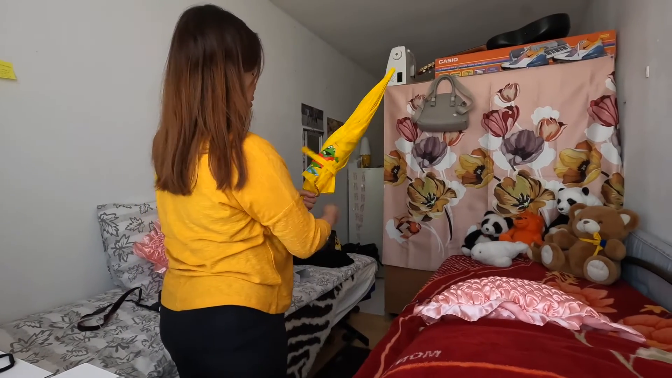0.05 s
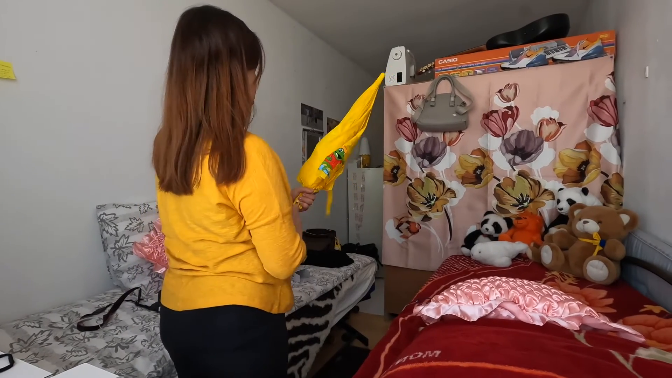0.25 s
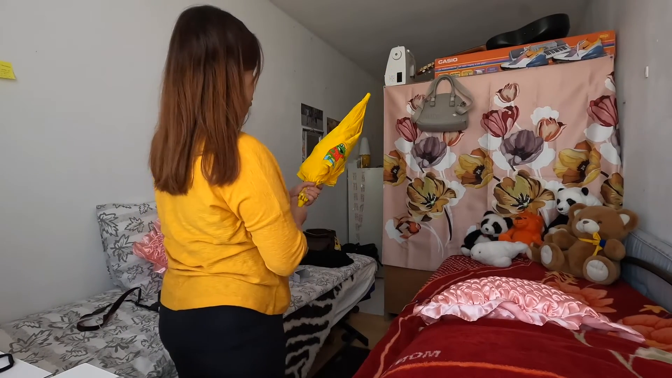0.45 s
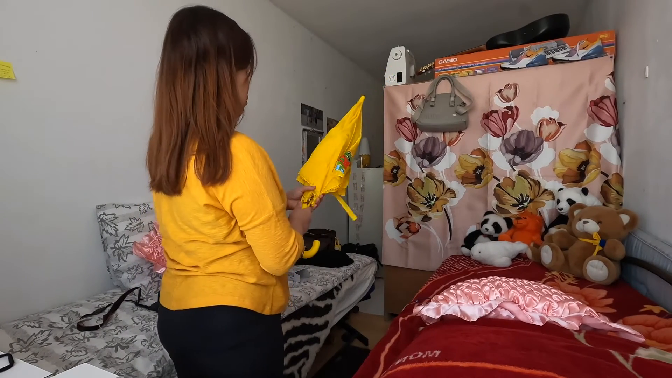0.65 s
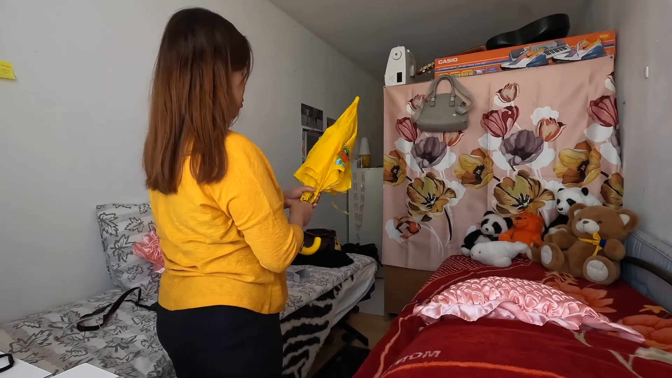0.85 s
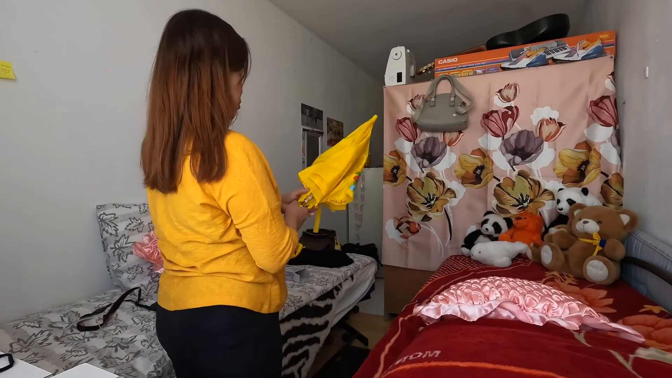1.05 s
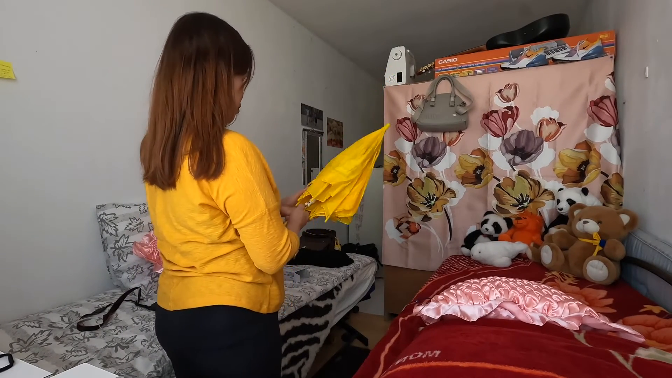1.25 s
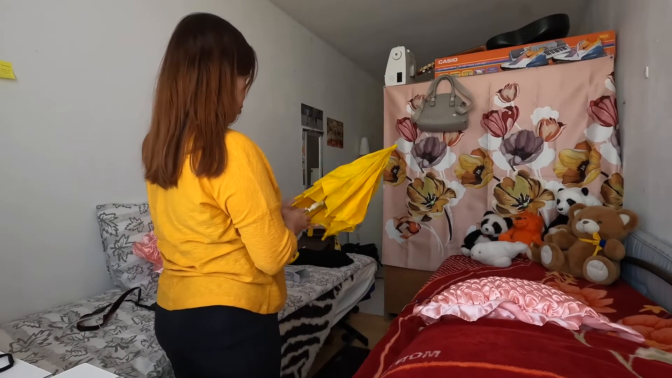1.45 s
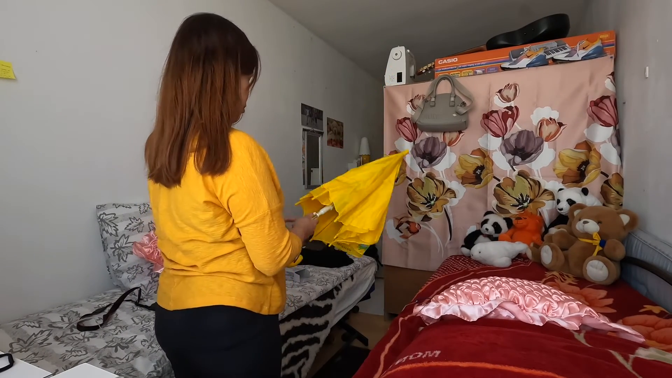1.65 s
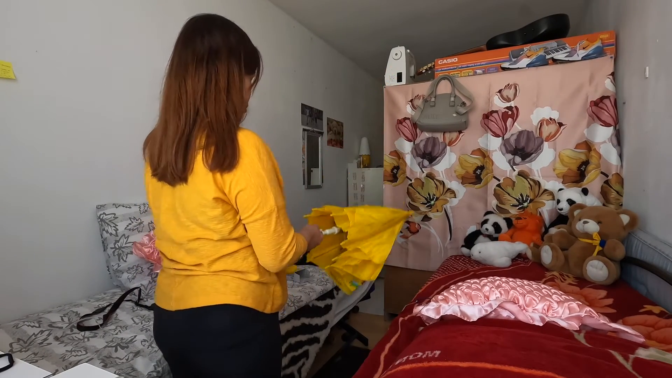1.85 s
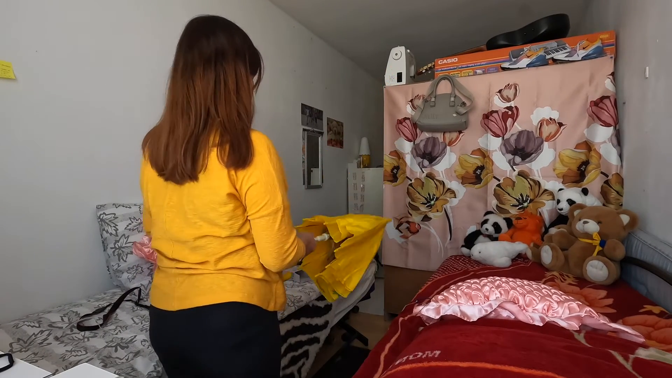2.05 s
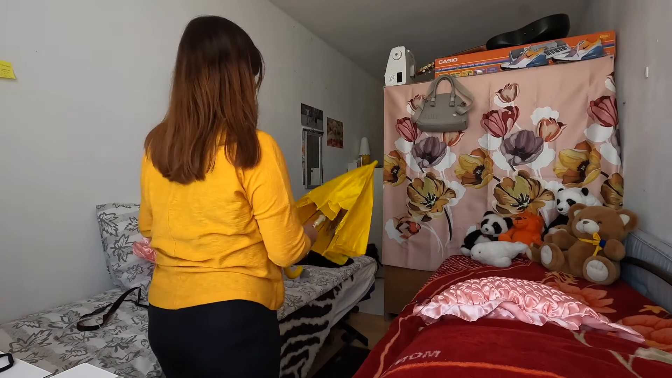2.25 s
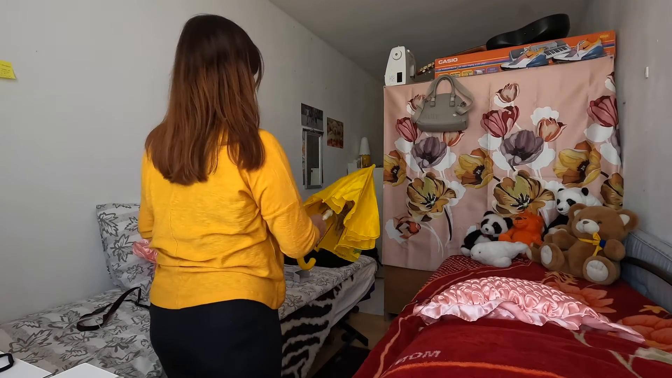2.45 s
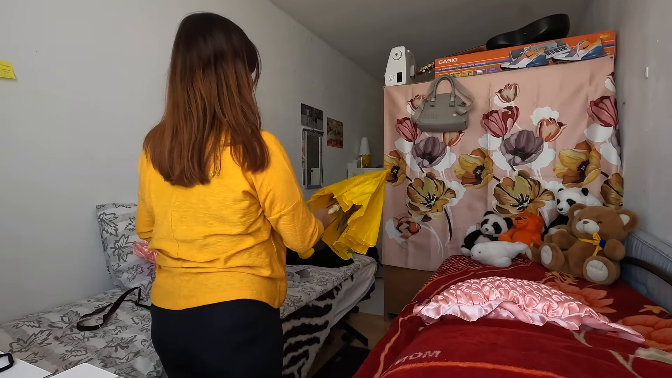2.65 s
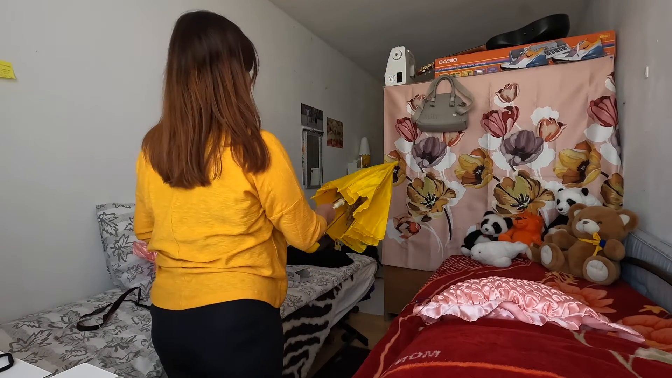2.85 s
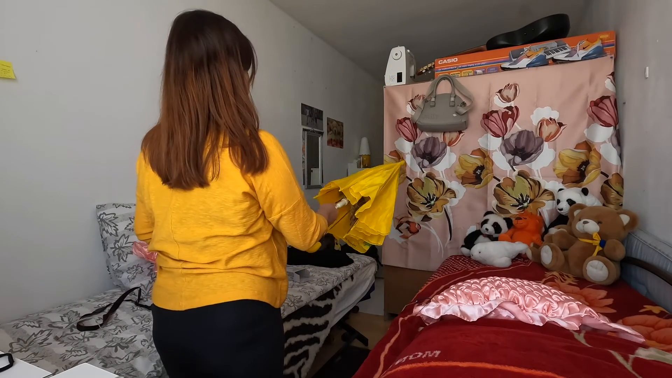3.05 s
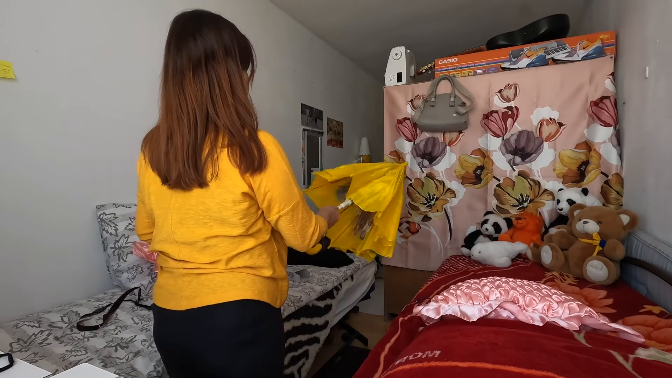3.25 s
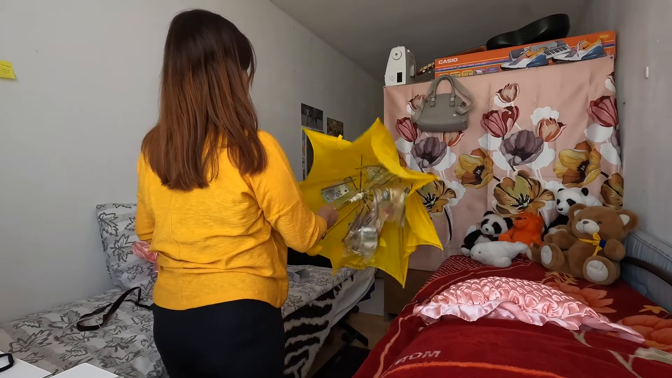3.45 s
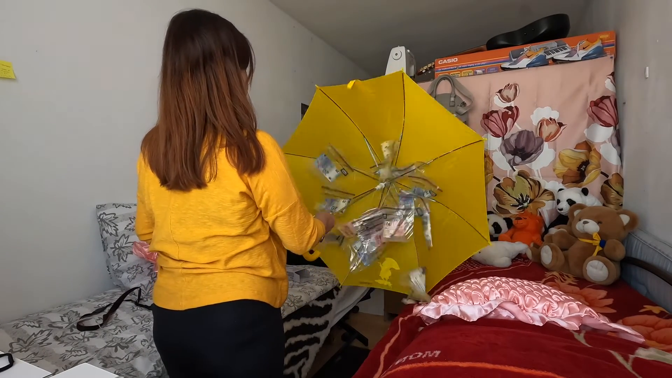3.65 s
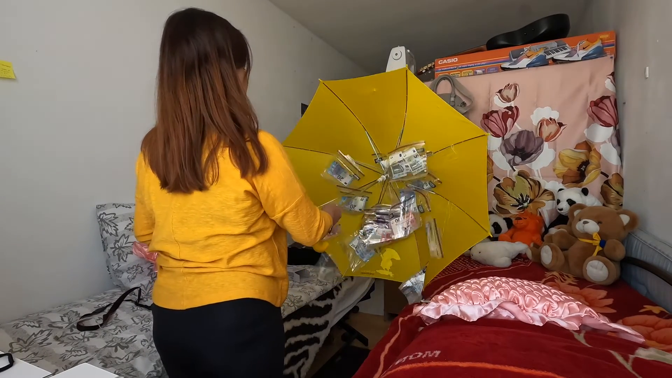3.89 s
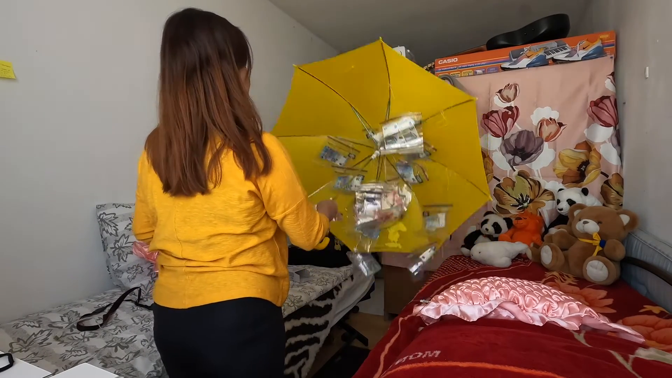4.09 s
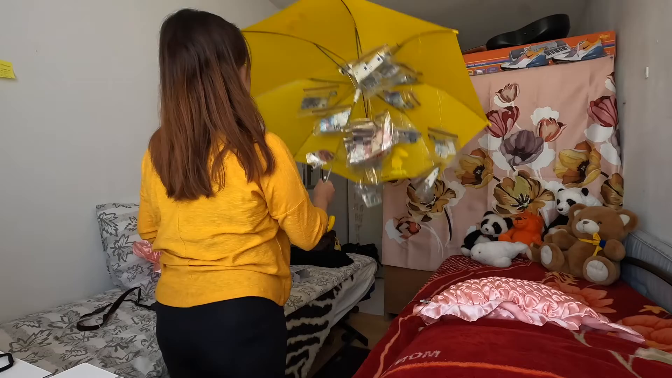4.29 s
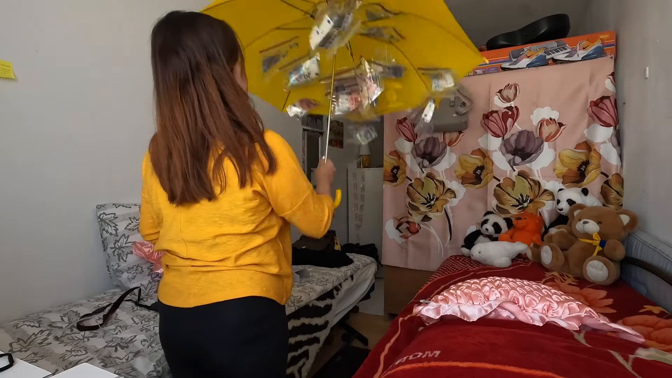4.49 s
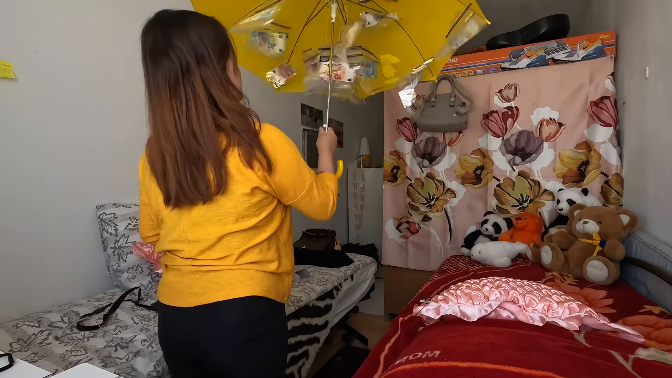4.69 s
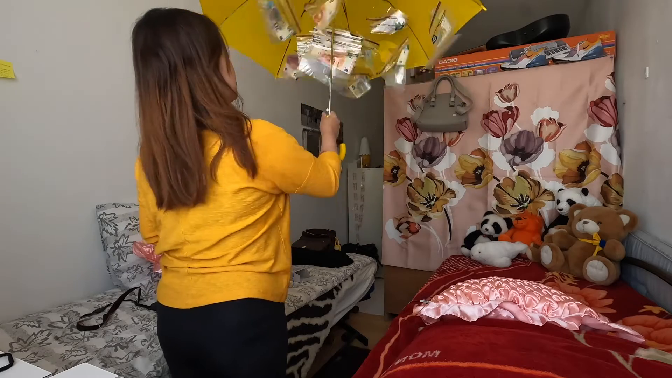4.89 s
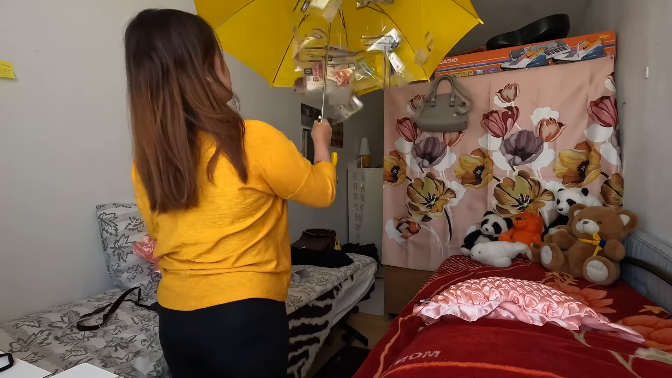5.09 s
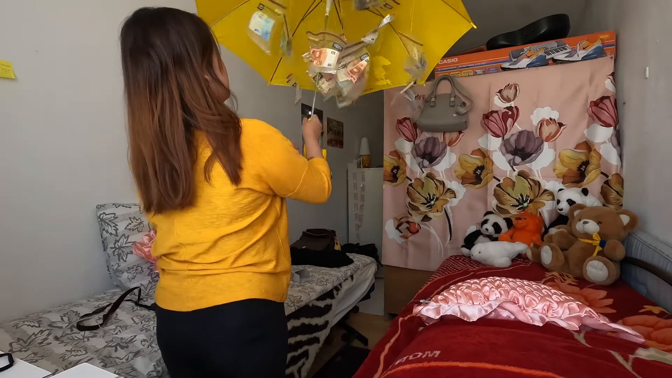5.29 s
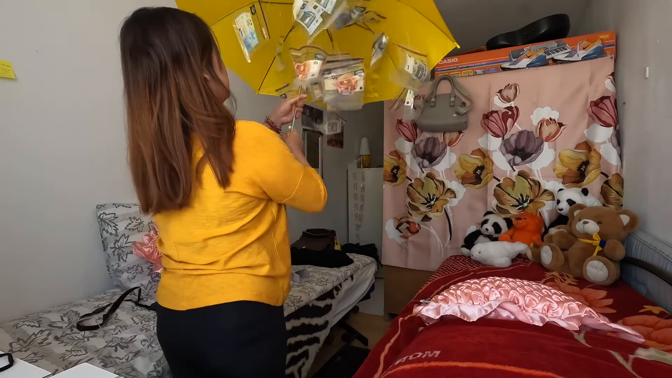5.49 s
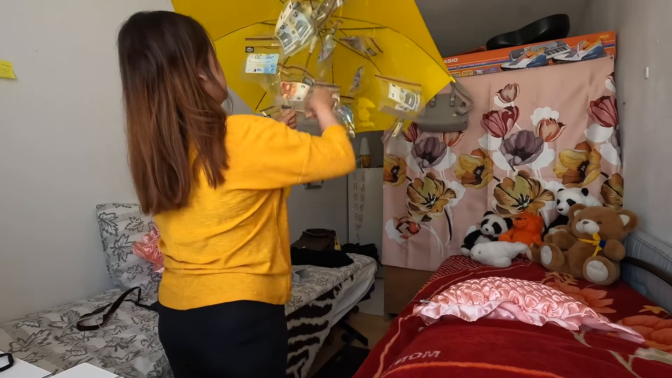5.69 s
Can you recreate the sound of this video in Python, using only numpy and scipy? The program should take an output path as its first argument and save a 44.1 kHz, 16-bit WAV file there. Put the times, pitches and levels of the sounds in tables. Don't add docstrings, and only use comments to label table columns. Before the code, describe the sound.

An umbrella hung with plastic pouches is rustled, pushed open with a booming, overloaded snap, then raised as the pouches crinkle and swing.

```python
import sys
import numpy as np
from scipy import signal
from scipy.fft import rfft, irfft, next_fast_len
from scipy.io import wavfile
from scipy.ndimage import uniform_filter1d, map_coordinates

SR = 44100
rng = np.random.default_rng(int(sys.argv[2]) if len(sys.argv) > 2 else 0)


def to_wav(sig):
    pcm = np.clip(np.atleast_2d(sig), -1, 1) * 32767
    pcm = np.round(pcm).astype(np.int16)
    wavfile.write(sys.argv[1], SR, pcm.T)


def boost(x):
    u = np.asarray(x, float) / 20
    return 10 ** u


N = 252604


def unit(x):
    return x / np.sqrt(np.mean(x ** 2) + 1e-20)


def along(points, hz):
    point_hz, value = np.transpose(points)
    return np.interp(np.log(hz + 1), np.log(point_hz + 1), value)


def curves(rows):
    s, *columns = np.transpose(rows)
    return [np.interp(np.arange(N) / SR, s, column) for column in columns]


def wobble(rate_hz):
    knots = rng.standard_normal(int(N * rate_hz / SR) + 4)
    return map_coordinates(knots, [np.arange(N) * rate_hz / SR])


def filtered(x, response):
    size = next_fast_len(N + SR // 2)
    return irfft(rfft(x, size) * response(np.fft.rfftfreq(size, 1 / SR)), size)[..., :N]


def coloured(x, spectrum):
    return unit(filtered(x, lambda hz: boost(along(spectrum, hz))))


def band_noise(low_hz, high_hz, order, count):
    sos = signal.butter(order, [low_hz, high_hz], "band", fs=SR, output="sos")
    return unit(signal.sosfilt(sos, rng.standard_normal(count)))


def ring(modes, attack_s, scatter_db, rough=0):
    t = np.arange(SR) / SR
    tones = np.zeros(SR)
    for hz, db, t60_s in modes:
        drift = rough * np.cumsum(rng.standard_normal(SR)) / np.sqrt(SR)
        level_db = db + scatter_db * rng.standard_normal() - 60 * t / t60_s
        tones += boost(level_db) * np.sin(2 * np.pi * hz * t + drift)
    return tones * (1 - np.exp(-t / attack_s))


def add(track, start_s, sound):
    part = track[round(start_s * SR):][:len(sound)]
    part += sound[:len(part)]


# hz, db_per_hz
PLASTIC = [(710, -24.5), (1200, -2), (1280, -7), (1350, -2), (3240, -5.5), (3600, -14), (4680, -39.5),
           (7920, -120)]
CRISP = [(2120, -31), (3600, -2.5), (4510, 0), (7800, -9), (10100, -35), (17200, -120)]
SHEEN = [(6000, -13), (7900, -10), (8960, -9), (9740, -5), (11300, -10), (12100, -7.5), (12900, -12),
         (13900, -12.5), (15000, -16), (15400, -26), (15600, -85)]
CLOTH = [(150, -31), (260, -6.5), (295, -1), (426, 1), (494, -8), (549, 0.5), (1400, -3.5), (1820, -60),
         (3080, -120)]


def rustle():
    crinkle_db, stiff_db = handling()
    crisp_db = -5 + 0.86 * stiff_db
    sheen_db = -15 + 1.36 * stiff_db
    flap_db = -3 - 0.1 * stiff_db + 0.11 * (crinkle_db + 45)
    buckling = patchy(crackle(14000, spread_db=1.0, clump_db=0.74), patchy_db=1.18)
    crinkle = coloured(buckling, PLASTIC)
    crinkle += boost(crisp_db) * coloured(buckling, CRISP)
    crinkle += boost(sheen_db) * coloured(buckling, SHEEN)
    flap = boost(flap_db) * coloured(crackle(7000, spread_db=1.5, clump_db=1.6), CLOTH)
    return boost(crinkle_db - 6.0) * (crinkle + flap)


def crackle(per_second, spread_db, clump_db):
    fires = rng.random(N) < per_second / SR
    bounded = np.minimum(rng.exponential(size=N), 3.5)
    size = boost(spread_db * bounded + clump_db * wobble(28))
    return fires * size * rng.standard_normal(N)


def patchy(x, patchy_db):
    z = signal.stft(x, nperseg=512)[2]
    field = uniform_filter1d(rng.standard_normal(z.shape), size=5, axis=0)
    field = uniform_filter1d(field, size=4, axis=1)
    return signal.istft(z * boost(patchy_db * unit(field)), nperseg=512)[1][:N]


# start_s, level_db, swell_s, fade_s,
# stiffness_db
MOVES = [(0.013, -21, 0.65, 0.063, 3.5), (0.16, -40, 0.16, 0.28, 2.5), (0.624, -53.5, 0.18, 0.73, 1.5),
         (0.736, -46, 0.13, 0.21, -2), (0.823, -43, 0.17, 0.28, 4), (0.918, -49.5, 0.03, 0.4, -1.5),
         (1.07, -49.5, 0.44, 0.075, 0.5), (1.198, -45, 0.091, 0.4, 4.5),
         (1.279, -45.5, 0.12, 0.32, 0.5), (1.37, -41.5, 0.14, 0.089, 6),
         (1.607, -39.5, 0.11, 0.29, 3.7), (1.822, -48.5, 0.11, 0.26, -1),
         (2.006, -43.5, 0.079, 0.23, -0.5), (2.211, -46, 0.13, 0.084, 1), (2.416, -53.5, 0.08, 0.53, 1),
         (2.65, -55.5, 0.047, 0.14, -1.5), (2.744, -57, 0.03, 0.11, 5.5),
         (4.095, -41, 0.53, 0.099, -4.2), (4.164, -45.5, 0.073, 0.11, 2),
           (4.269, -44.1, 0.36, 0.27, -1.5), (4.381, -48.5, 0.037, 0.088, 5.5),
           (4.5, -52.5, 0.29, 0.8, 3.5), (4.706, -38.5, 0.072, 0.15, 0.3), (4.82, -37, 0.062, 0.15, -4),
           (4.907, -32.5, 0.025, 0.32, -3.2), (5.14, -35.5, 0.057, 0.12, -0.7),
           (5.226, -38, 0.086, 0.52, -3.2), (5.305, -37, 0.044, 0.077, 0), (5.429, -34.0, 0.02, 0.16, -2.5),
           (5.562, -37, 0.12, 0.1, -1), (5.645, -45.5, 0.076, 0.75, -1.2),
         (.118, -48, .02, .1, -2),
    (1.5, -56, .2, .2, 10),
    (4.675, -49, 0.066, .06, 16),
]


def handling():
    s, db, swell_s, fade_s, stiff_db = np.transpose(MOVES)[..., None]
    late_s = np.arange(N) / SR - s
    power = boost(2 * (db - 20 * np.maximum(-late_s / swell_s, late_s / fade_s)))
    effort, push_stiff_db = push()
    total = power.sum(0) + effort ** 2 + 1e-12
    stiffness_db = ((power * stiff_db).sum(0) + effort ** 2 * push_stiff_db) / total
    return 10 * np.log10(total), stiffness_db


# time_s, effort_db, stiffness_db
PUSH = [
    (3.278, -69, 3),
    (3.296, -43, 2),
    (3.345, -37.5, 2),
    (3.62, -30, 0.5),
    (3.742, -26, -3),
    (3.756, -24, -2),
    (3.826, -17.5, -2),
    (3.948, -38.5, -3.5),
    (4.008, -57, 0),
]


def push():
    t = np.arange(N) / SR
    effort_db, stiff_db = curves(PUSH)
    return boost(effort_db) * (t > PUSH[0][0]) * (t < PUSH[-1][0]), stiff_db


# start_s, pump_db, drum_db
BLOWS = [
    (3.783, -5, -31),
    (3.823, 2.5, 0),
    (3.845, -18, -15),
    (3.865, -21, -14),
]
# hz, level_db, t60_s
PUMP = [(25.87, -5, 0.81), (13.32, -12.5, 2.3), (33, -13.5, 0.88), (59.5, -4, 0.6), (79.6, -10.5, 0.15)]
# hz, level_db, t60_s
DRUM = [(125.2, -1, 0.28), (139.9, 1, 0.29), (165.1, -4.5, 0.223), (232.6, -1.5, 0.14), (264.6, -2, 0.1),
        (335, -7.5, 0.135), (388, 0, 0.073), (607, -2, 0.072), (740, -6.5, 0.079), (1070, -11, 0.11),
        (1240, -11, 0.088)]


def snap():
    heave, boom, t = np.zeros(N), np.zeros(N), np.arange(SR) / SR
    for s, pump_db, drum_db in BLOWS:
        add(heave, s, boost(pump_db) * ring(PUMP, 0.0051, scatter_db=2.5))
        crack = 0.099 * boost(-60 * t / 0.014) * rng.standard_normal(SR)
        panels = ring(DRUM, 0.0026, scatter_db=0, rough=7.8)
        add(boom, s, boost(drum_db - 5.0) * (panels + crack))
    return heave, boom


# start_s, peak_db, pitch_hz, spit_db (relative)
CRINKLES = [(0.1538, -25, 3280, -2), (0.725, -31, 2150, -20), (1.1628, -45, 1450, -13),
            (1.574, -30.5, 3780, -2), (1.9794, -34, 1340, -20), (2.7384, -50, 1170, -7),
            (3.293, -27.5, 1050, -16.5), (3.6917, -17, 1000, -17), (3.7574, -5.5, 2570, -25.5),
            (3.8226, -2, 1185, -11), (3.826, -5.5, 2900, -4.5), (3.838, -9.5, 1900, -8),
            (4.051, -28, 3500, -15), (4.0882, -28.5, 3300, -20), (4.158, -33, 1240, -13),
            (4.225, -34, 1000, -23), (4.2955, -28.5, 1710, -23), (4.376, -37, 1420, -8),
            (4.497, -42, 1800, -18), (4.809, -35, 2490, -19), (4.8913, -29, 1870, -34),
            (5.118, -26, 1340, -14), (5.2999, -32, 3270, -26), (5.428, -21, 1050, -19),
            (5.5453, -23, 2960, -18), (5.6476, -26.5, 1240, -10)]


def folds():
    out, t = np.zeros(N), np.arange(SR // 5) / SR
    for s, db, hz, spit_db in CRINKLES:
        t60_s = 0.1 * (1000 / hz) ** 0.2
        body = band_noise(hz * 0.91, hz * 1.07, 1, len(t))
        spit = band_noise(3500, 8500, 2, len(t))
        envelope = boost(db - 12.5 - 60 * t / t60_s) * (1 - np.exp(-t / 0.0042))
        add(out, s, envelope * (body + boost(spit_db) * spit))
    return out


# start_s, peak_db, pitch_hz
PATS = [(0.914, -35.5, 950), (1.069, -34.5, 610), (1.199, -38, 626), (1.259, -40, 695), (1.358, -37, 780),
        (1.409, -39.5, 1100), (1.611, -48, 1300), (3.446, -25.5, 440), (3.547, -21.5, 1140),
        (3.658, -17.5, 615), (3.7075, -12, 1050), (4.094, -37, 541), (4.939, -25.5, 1190),
        (5.122, -27, 1280), (5.135, -28, 420), (5.264, -30, 1350), (5.43, -23, 1100)]


def pats():
    out, t = np.zeros(N), np.arange(SR // 5) / SR
    t60_s, attack_s = 0.09, 0.0012
    for s, db, hz in PATS:
        puff = band_noise(hz * 0.62, hz * 1.23, 2, len(t))
        add(out, s, boost(db - 8.5 - 60 * t / t60_s) * (1 - np.exp(-t / attack_s)) * puff)
    return out


# start_s, level_db
KNOCKS = [
    (0.016, -1),
    (0.049, -12),
    (0.121, -16.5),
    (0.138, -20.5),
    (0.156, -22.5),
]
# hz, level_db, t60_s
HANDLE = [(335, -6, .09), (445, 0, .085), (520, -8, .07), (605, -7, .08), (738, -8, .065), (1020, -18, .08),
          (1240, -22, .06)]
# start_s, level_db
TICKS = [
    (0.009, -16.5),
    (3.757, -16),
    (5.297, -19.5),
    (5.546, -33),
]
# hz, level_db, t60_s
RIB = [(2406, -5, 0.046), (2570, -28, 0.062), (3270, -7.5, 0.13), (3940, -6, 0.072), (4370, -3.5, 0.036),
       (4670, -5.5, 0.057), (6000, -11.5, 0.052), (6830, -23, 0.028)]


def knocks():
    out = np.zeros(N)
    for s, db in KNOCKS:
        add(out, s, boost(db - 8) * ring(HANDLE, 0.002, scatter_db=1, rough=9))
    for s, db in TICKS:
        add(out, s, boost(db - 7.5) * ring(RIB, 0.0019, scatter_db=4, rough=46))
    return out


# hz, t60_s
ROOM = [(100, 0.22), (1000, 0.29), (10000, 0.15)]


def room(x):
    step, delay, out = SR // 4, 150, np.zeros((2, N + SR))
    for start in range(0, N, step):
        hz, t, z = signal.stft(rng.standard_normal((2, SR // 2)), SR, nperseg=256)
        decay = boost(-60 * t / along(ROOM, hz)[:, None])
        tail = signal.istft(z * decay, SR, nperseg=256)[1]
        wet = signal.fftconvolve(x[None, start:start + step], tail / np.linalg.norm(tail[0]), axes=1)
        out[:, start + delay:start + delay + wet.shape[1]] += wet
    return out[:, :N]


# start_s, level_db, pitch_hz, t60_s
THUMPS = [(.1, -27, 45, .25), (.42, -35, 62, 0.25), (1.2, -28.5, 106, .2), (1.425, -21.5, 42, 0.14),
          (1.95, -30, 45.3, 0.32), (3.551, -22, 63, 0.31), (3.706, -12.5, 56.5, 0.21),
          (4.602, -29, 99.7, 0.33), (4.951, -29.5, 80.6, 0.2), (5.191, -28, 54.5, 0.28),
          (5.22, -26, 107, 0.19), (5.58, -29.5, 70.4, 0.36)]


def thumps():
    out = np.zeros(N)
    for s, db, hz, t60_s in THUMPS:
        add(out, s, ring([(hz, db, t60_s)], 0.0041, scatter_db=1.0))
    return out


# time_s, level_db
DRAUGHT = [(0.0, -29.5), (0.19, -34.5), (0.31, -52.5), (0.71, -33.5), (1.52, -42), (1.73, -52),
           (1.94, -36.5), (2.25, -33), (2.27, -43.5), (3.49, -38.5), (3.5, -45),
           (4.3, -37),
    (4.446, -41.5),
    (4.662, -35),
    (4.754, -44.5),
    (5.256, -32),
    (5.272, -38.5),
    (5.72, -40.5),
]
# time_s, gain_db
HUM_GAIN = [(0, 1), (.5, -4.5), (1.15, -1.5), (1.75, -1), (2.7, 1), (3.3, 1), (4.4, -4), (4.7, -2),
            (5.73, 0)]
STIR_DB = (24.5, 23.5, 24)
# hz, db_per_hz
ROCKING = [(18, -49), (30, -0.5), (54, 1.5), (71, -6.5), (86, -24), (95, -6.5), (120, -35), (210, -120)]
DRONE = [(50, -43), (85, -5), (146, 0.5), (158, -2), (177, -6.5), (221, -11.5), (238, -5.5), (259, -26.5),
         (300, -17.5), (390, -44), (660, -120)]
SWAY = [(2, -37), (6, 2), (25, -5), (35, -1.5), (70, -120)]
HUM = [(200, -23), (295, 3), (400, -11), (520, -9), (690, -3), (800, -9), (960, -14), (1015, -2),
       (1150, -1), (1550, -18.5), (2700, -23.5), (3700, -32), (4600, -27.5), (15400, -53)]


def background():
    draught_db, = curves(np.array(DRAUGHT))
    gain_db, = curves(HUM_GAIN)
    opened = np.arange(N) / SR > BLOWS[0][0]
    sway_db = -42 + 0.37 * (draught_db - draught_db.mean()) + 6.5 * opened
    drone_db = -43 + 1.4 * gain_db + 2 * wobble(4)
    effort, _ = push()
    out = boost(-56 + gain_db) * coloured(rng.standard_normal(N), HUM)
    for db, stir_db, spectrum in zip((draught_db, drone_db, sway_db), STIR_DB, (ROCKING, DRONE, SWAY)):
        gain = np.minimum(np.hypot(boost(db), boost(stir_db) * effort ** 2), boost(-25))
        out += gain * coloured(rng.standard_normal(N), spectrum)
    return out + thumps()


def scene():
    heave, boom = snap()
    near = rustle() + folds() + pats() + knocks() + boom
    wet, other = room(filtered(near, lambda hz: hz ** 2 / (hz ** 2 + 600 ** 2)))
    mid = boost(2.0) * near + boost(-9.5) * wet + boost(-2.5) * heave + background()
    side = filtered(0.52 * mid + 0.85 * other, lambda hz: hz > 11000)
    return np.array([mid + side, mid - side])


def top_cut(x):
    return signal.sosfilt(signal.butter(12, 15660, fs=SR, output="sos"), x)


def record(dry):
    ceiling = 0.995
    heard = filtered(dry, lambda hz: 1 / (1 + (hz / 15200) ** 60))
    clipped = heard / (1 + np.abs(heard / ceiling) ** 40) ** (1 / 40)
    return top_cut(clipped)


dry = scene()
out = record(dry)
to_wav(out)
```